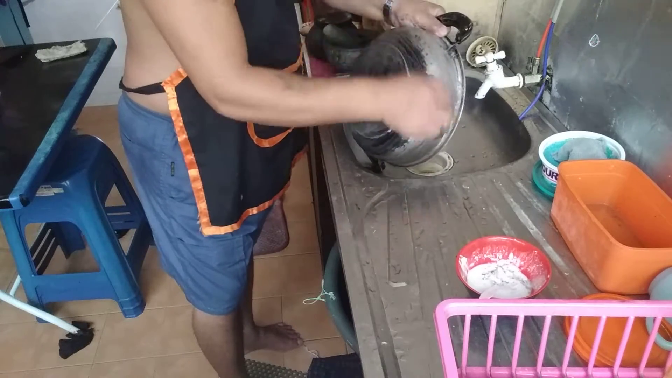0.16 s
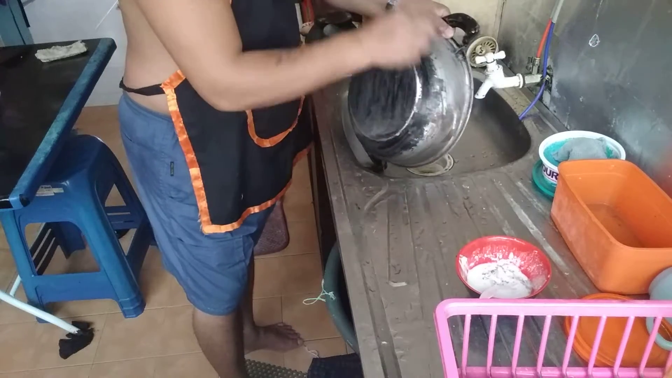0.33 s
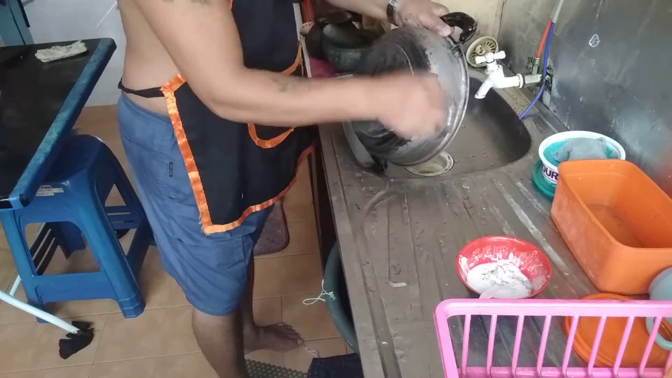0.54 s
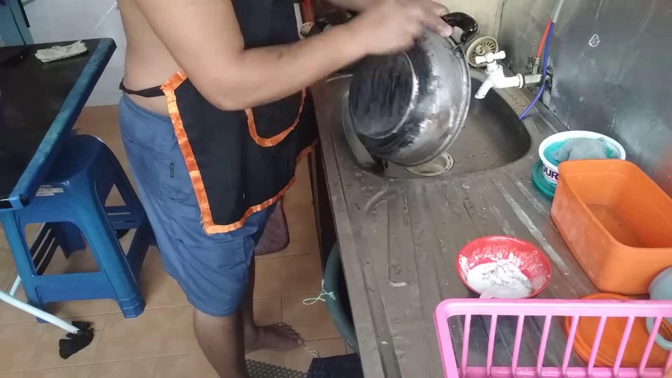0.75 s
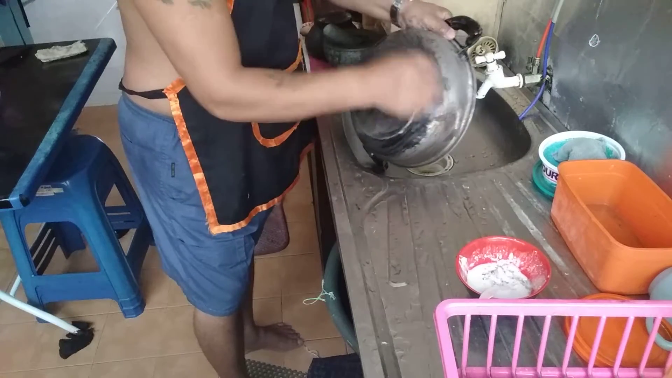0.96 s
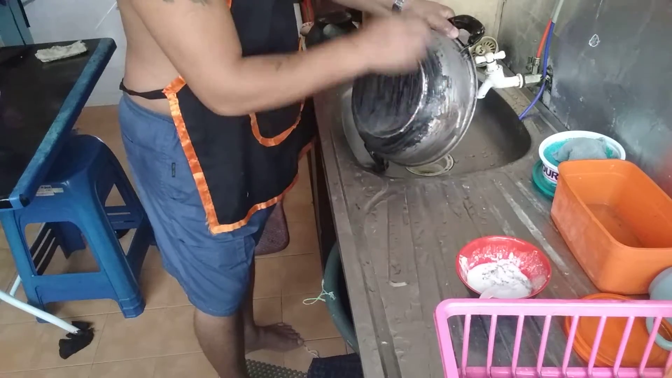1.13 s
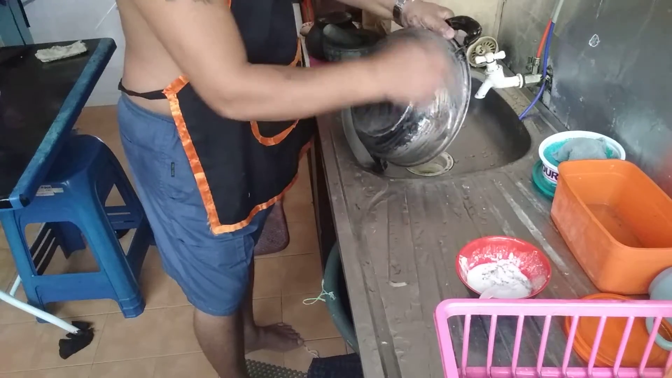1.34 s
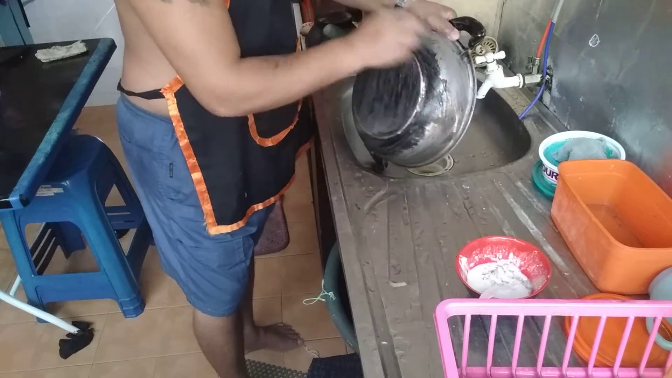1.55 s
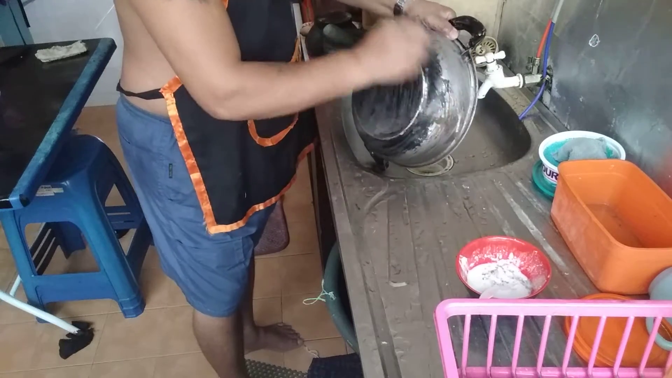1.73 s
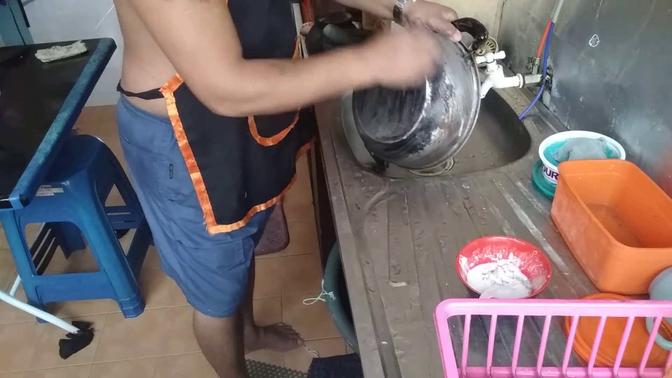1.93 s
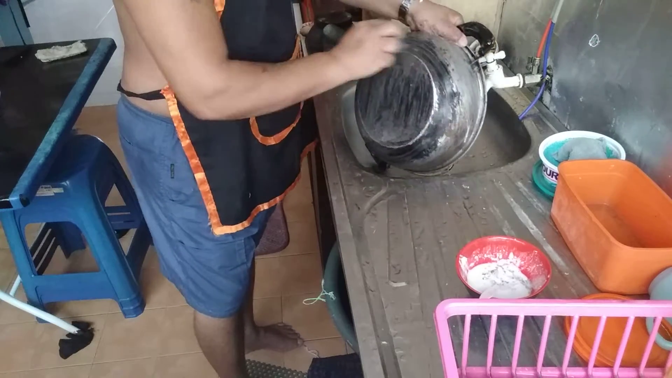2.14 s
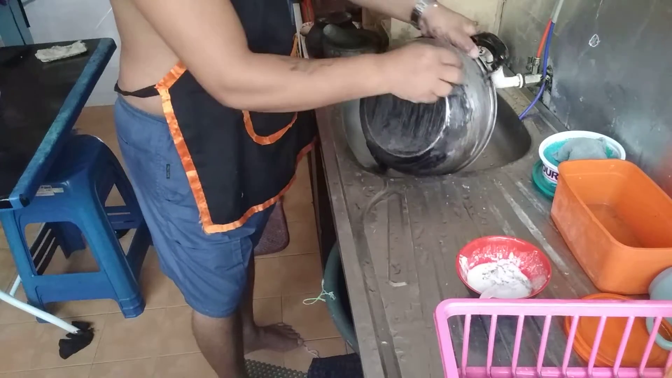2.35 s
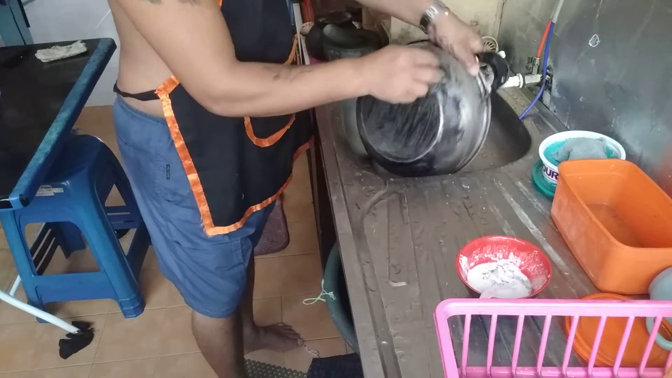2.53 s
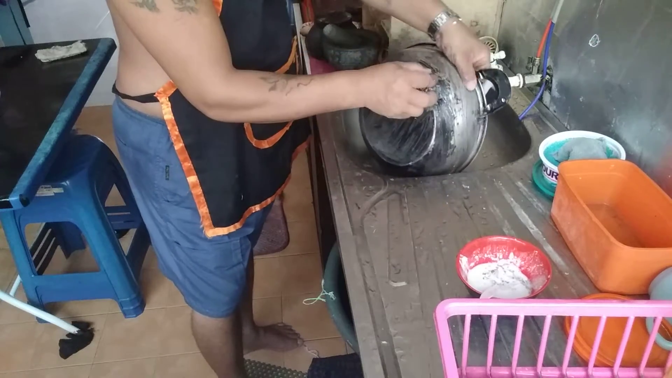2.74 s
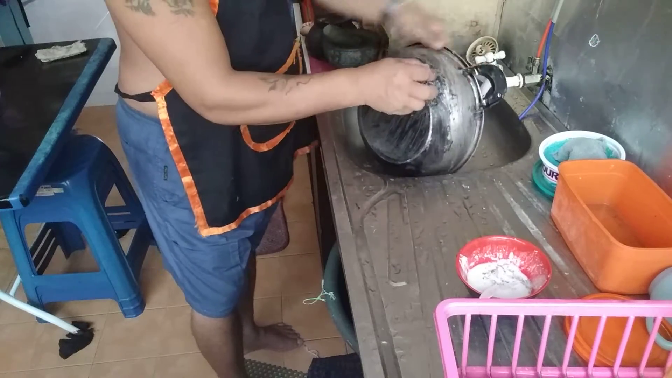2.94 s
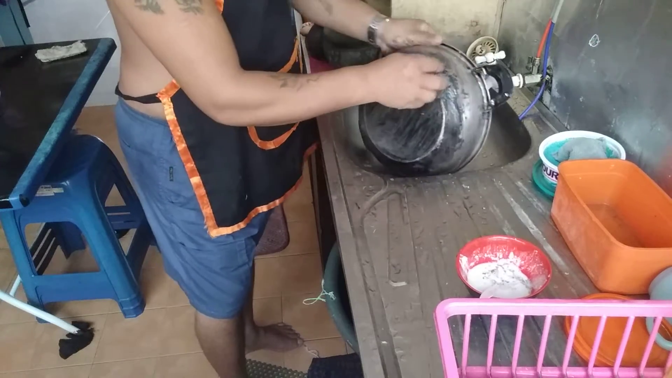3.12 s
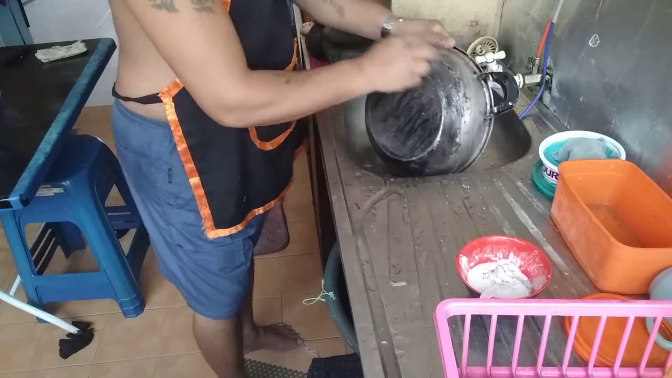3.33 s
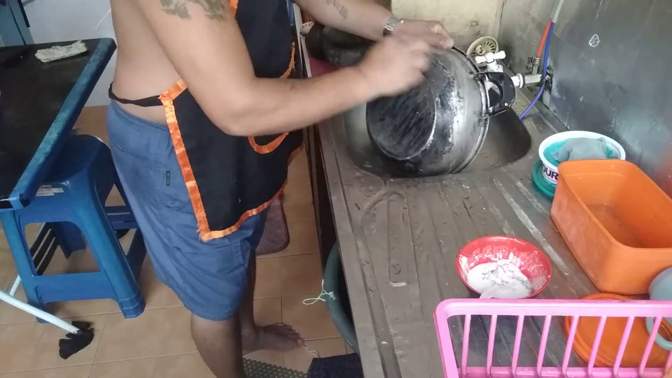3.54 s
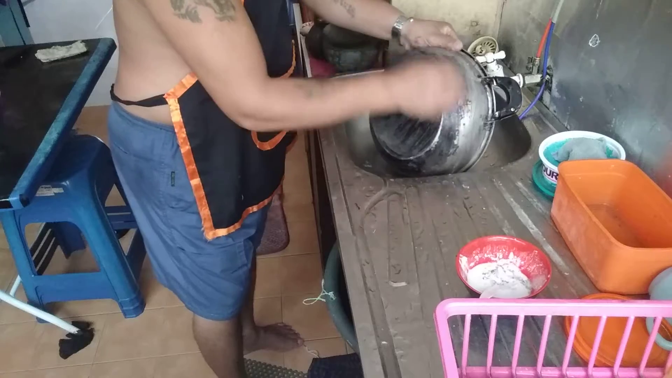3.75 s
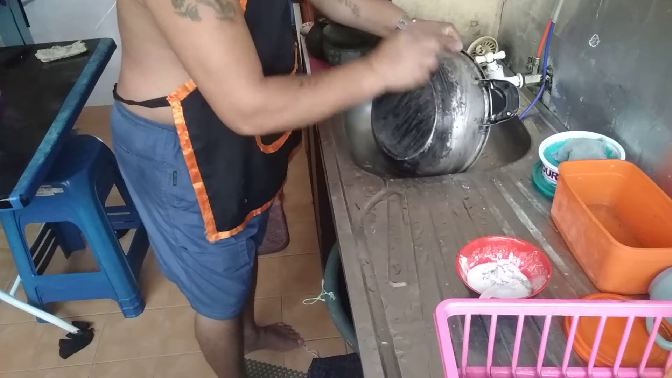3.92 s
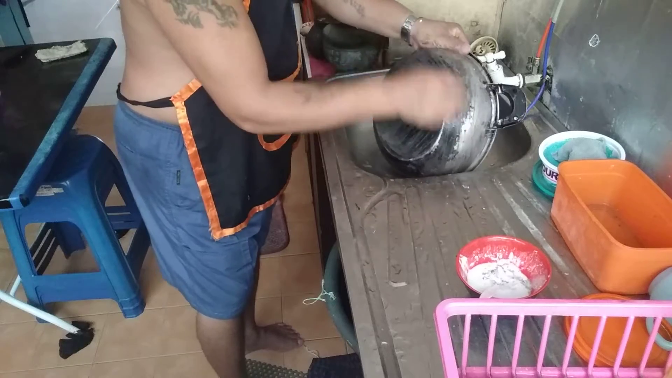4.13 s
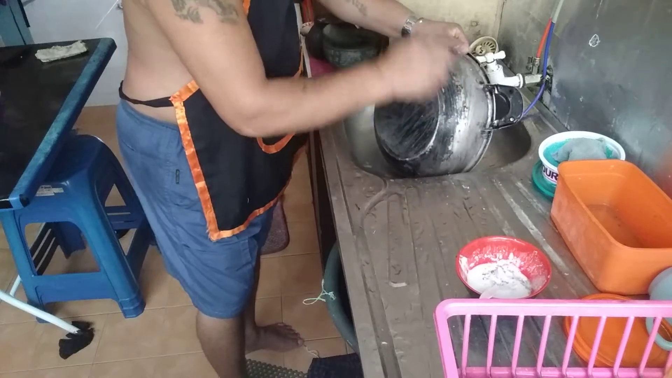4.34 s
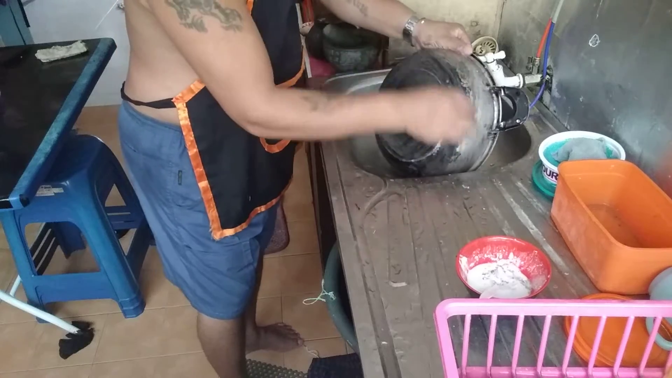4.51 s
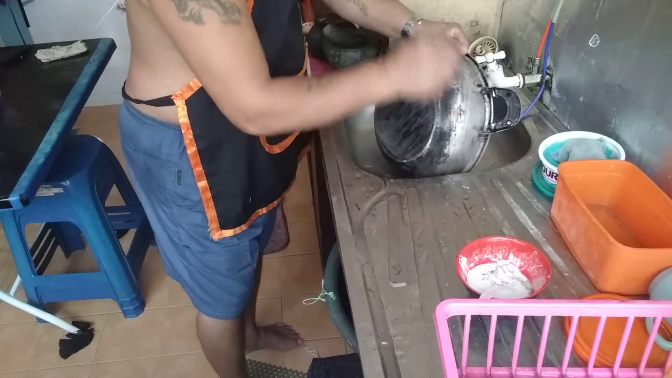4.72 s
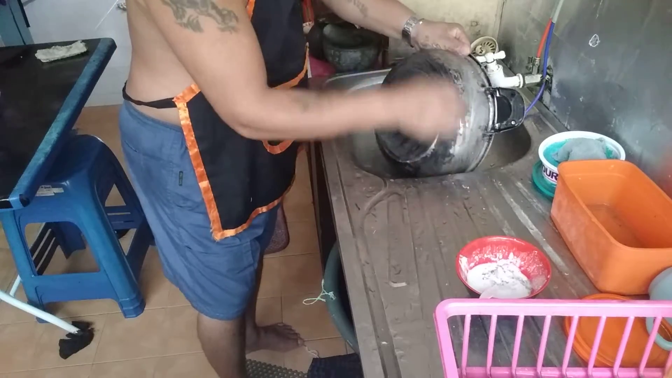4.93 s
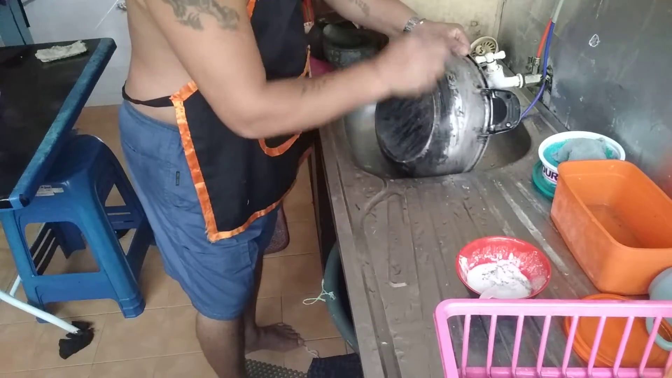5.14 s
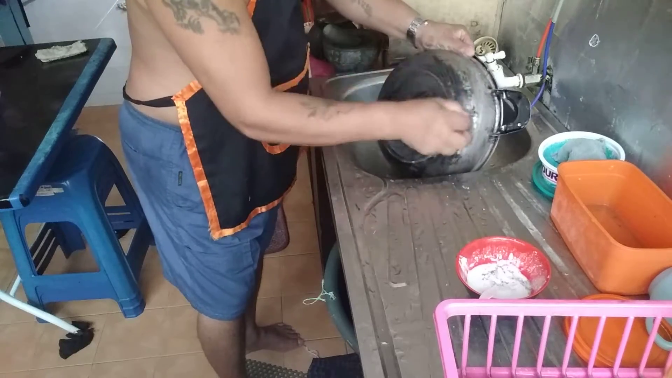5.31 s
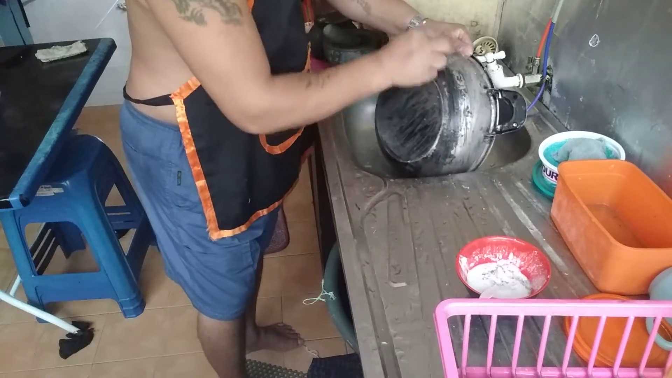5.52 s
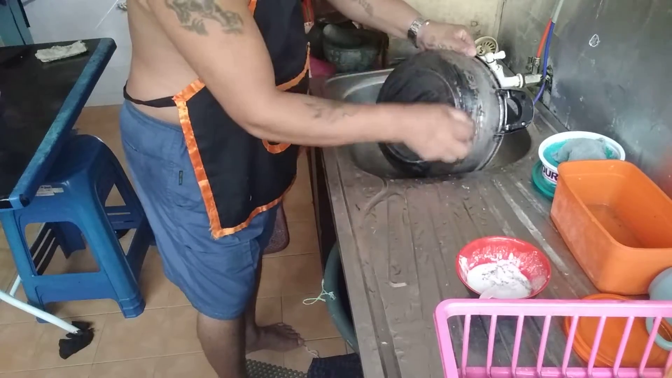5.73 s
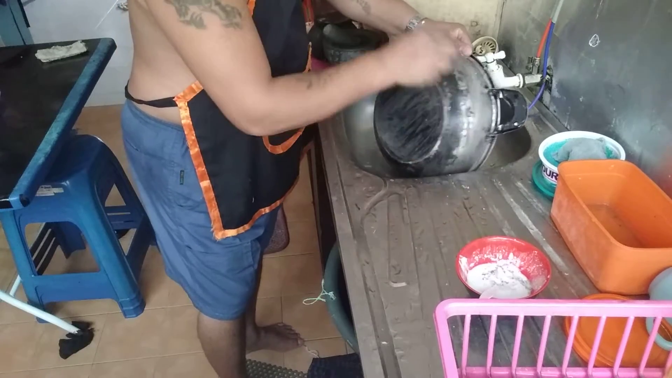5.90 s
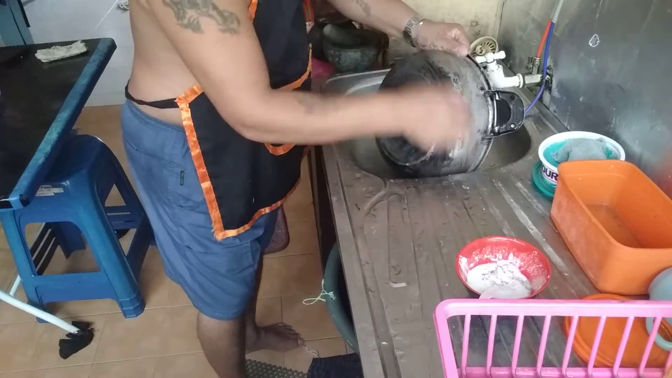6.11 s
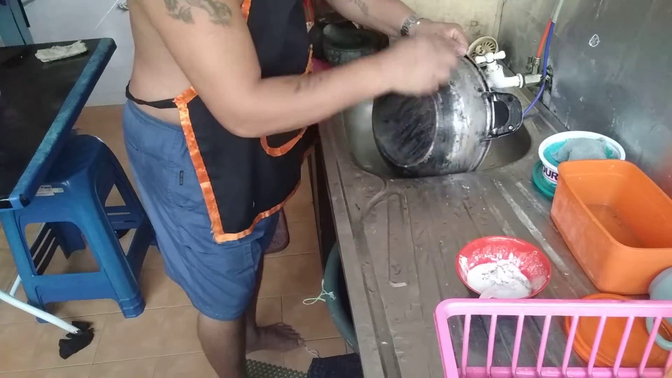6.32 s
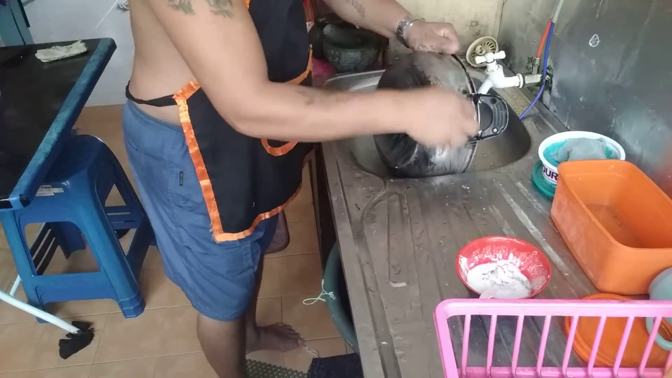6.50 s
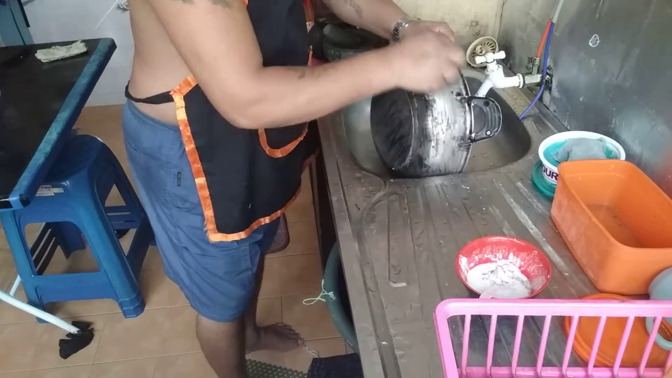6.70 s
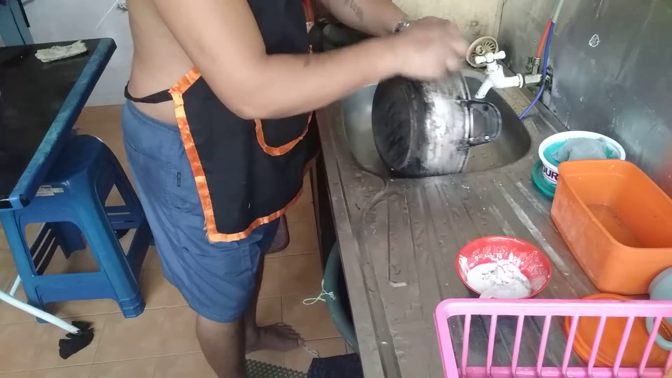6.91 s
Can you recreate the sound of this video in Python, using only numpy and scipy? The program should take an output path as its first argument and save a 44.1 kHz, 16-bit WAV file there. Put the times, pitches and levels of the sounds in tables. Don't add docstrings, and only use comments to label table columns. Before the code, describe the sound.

Brisk to-and-fro scrubbing on metal, crisp and sandy, dipping at every turn of the hand. Low rumbles and soft bumps come from the pot rocking on the sink. Midway there is a short near-quiet gap with a hollow clank, small ticks and another knock, then more energetic scrubbing that tapers to light rubs with a dull bump. Close single microphone, short room echo, faint hum.

```python
import sys
import numpy as np
from scipy import signal
from scipy.fft import rfft, irfft
from scipy.io import wavfile
from scipy.ndimage import uniform_filter1d

SR = 44100
rng = np.random.default_rng(int(sys.argv[2]) if len(sys.argv) > 2 else 0)


def wav_record(signal):
    frames = np.transpose(np.atleast_2d(signal))
    bounded = np.clip(frames, -1, 1)
    quanta = np.round(bounded * 32767).astype(np.int16)
    wavfile.write(sys.argv[1], SR, quanta)


def nominal_scale(level):
    x = np.asarray(level, float) / 20
    return 10 ** x


N = 311346
T = np.arange(N) / SR


def evened(x):
    return x / np.sqrt(np.mean(x ** 2) + 1e-20)


def coloured(x, points):
    f, db = np.transpose(points)
    hz = np.fft.rfftfreq(len(x), 1 / SR)
    curve_db = np.interp(np.log(hz + 1), np.log(f + 1), db)
    return evened(irfft(rfft(x) * nominal_scale(curve_db), len(x)))


def noise(size=N):
    return rng.standard_normal(size)


def wobble(span_s):
    size = max(int(span_s * SR), 2)
    return evened(uniform_filter1d(uniform_filter1d(noise(), size), size))


# [t/s, level at the turn/dB, level mid-stroke/dB, place of the top/0-1, bite of the wires/dB]
FIRST_BOUT = [(0.02, -27, -16.5, 0.59, -4.5), (0.236, -26, -17, 0.51, -4),
              (0.433, -30.5, -16.5, 0.51, -2.5), (0.65, -28, -15, 0.45, -4.5), (0.846, -30, -16, 0.57, 0),
              (1.072, -30.5, -16, 0.46, -0.5), (1.254, -31, -16.5, 0.47, -0.5),
              (1.477, -30, -15.5, 0.43, -2.5), (1.683, -37, -16, 0.57, 0.5), (1.893, -27.5, -15.5, 0.29, 1),
              (2.162, -34.5, -18.5, 0.43, 1.5), (2.401, -42, -29, 0.19, 4.5), (2.62, -49, -52, 0.5, -5)]
SECOND_BOUT = [(3.27, -37.5, -23.5, 0.56, 1), (3.499, -40, -17, 0.64, 0.5), (3.742, -31.5, -16, 0.43, -2),
               (3.906, -31.5, -17, 0.63, 1), (4.145, -28.5, -15.5, 0.37, -0.5), (4.321, -34, -15, 0.5, 1),
               (4.53, -34, -16.5, 0.42, 0.5), (4.726, -33, -15.5, 0.51, -0.5),
               (4.928, -27.5, -15.5, 0.39, -1), (5.13, -33, -15.5, 0.47, 2), (5.374, -42, -16.5, 0.48, -2),
               (5.576, -32, -15, 0.47, 0.5), (5.799, -34, -16.5, 0.36, 0), (6.014, -33.5, -15.5, 0.6, -2.5),
               (6.219, -29, -17, 0.39, -2), (6.398, -31.5, -21, 0.49, -5), (6.555, -33, -24.5, 0.34, -5),
               (6.717, -31.5, -28, 0.62, -11), (6.857, -35.5, -29.5, 0.51, 2), (7.002, -38, -31, 0.5, 7),
               (7.12, -39, -39, 0.5, 0)]
# [t/s, level/dB]
RESTING = [
    (2.62, -40),
    (2.72, -56),
    (2.799, -54.5),
    (2.88, -45),
    (3.0, -63),
    (3.04, -43),
    (3.09, -42.5),
    (3.15, -40.5),
    (3.27, -39),
]


def hand(roundness=1.47):
    s, resting_db = np.transpose(RESTING)
    speed = nominal_scale(np.interp(T, s, resting_db))
    bite_db = np.full(N, 3.0)
    for bout in (FIRST_BOUT, SECOND_BOUT):
        for stroke, following in zip(bout, bout[1:]):
            s0, turn0_db, top_db, place, bite = stroke
            s1, turn1_db = following[:2]
            now = (T >= s0) & (T < s1)
            way = (T[now] - s0) / (s1 - s0)
            bent = np.interp(way, [0, np.clip(place, 0.1, 0.9), 1], [0, 0.5, 1])
            turn = nominal_scale(turn0_db + way * (turn1_db - turn0_db))
            speed[now] = turn + (nominal_scale(top_db) - turn) * np.sin(np.pi * bent) ** roundness
            bite_db[now] = bite
    speed[T < FIRST_BOUT[0][0]] = nominal_scale(FIRST_BOUT[0][1])
    return speed, uniform_filter1d(bite_db, size=1500)


def slips(per_s, spread_db):
    size_db = spread_db * np.minimum(rng.exponential(1, N), 5)
    size = nominal_scale(size_db) * rng.choice([-1., 1.], N)
    return evened(size * (rng.random(N) < per_s / SR))


def resonate(x, hz, width):
    return signal.lfilter(*signal.iirpeak(hz, hz / width, SR), x)


# [f/Hz, level/dB per Hz]
HISS = [(2940, -43), (5000, -22), (5360, -13.5), (6520, -15), (8450, -10), (12000, -0.5), (14700, -0.5),
        (15500, -5), (16200, -7.5), (16500, -62)]
# [f/Hz, level/dB per Hz]
SCRAPE = [(1500, -23.5), (2500, -14), (3500, -11), (4300, -5.5), (4800, -1), (5500, -7.5), (6200, -2),
          (7000, -0.5), (9000, -0.5), (12000, -61)]
# [f/Hz, level/dB per Hz]
RUB = [(900, -12), (1800, -3), (3000, -0.5), (4200, -6), (6000, -28)]
# [from t/s, to t/s]
HELD = [
    (2.41, 3.27),
    (6.64, 7.2),
]
# [f/Hz, width/Hz, level/dB]
WALL = [(426, 36, -13.5), (667.7, 9.2, -11.5), (1092, 61, -11.5), (1183, 27, -18.5), (1315, 12.6, -7.5),
        (1810, 990, -9.5), (2140, 15, -8), (2413, 15, -9.5), (2855, 38, -4.5), (3189, 39, -1.5),
        (3724, 83, -4), (4255, 25, 0), (4630, 94, -1)]


def scourer():
    speed, bite_db = hand()
    clumps_db = 0.74 * wobble(0.02) + 0.33 * wobble(0.0038)
    force = speed * nominal_scale(clumps_db)
    fine = slips(per_s=24000, spread_db=2.0)
    coarse = slips(per_s=16000, spread_db=1.0)
    scrape = nominal_scale(-16 + bite_db) * (speed / 0.19) ** 0.086
    out = force * coloured(fine, HISS) + force * scrape * coloured(coarse, SCRAPE)

    held = sum(1.0 * ((T > a) & (T < b)) for a, b in HELD)
    held = uniform_filter1d(held, size=1500)
    out += held * nominal_scale(-46) * (force / 0.19) ** 0.71 * coloured(coarse, RUB)

    ring = nominal_scale(-28.5 + 0.8 * bite_db)
    ring = ring * (speed / 0.11) ** -0.3
    ring = ring * nominal_scale(-9 * held)
    for hz, width, db in WALL:
        nodes_db = 3.6 * np.tanh(wobble(0.061))
        drive = force * ring * nominal_scale(db - 5.5 + nodes_db) * noise()
        out += resonate(drive, hz, width) * np.sqrt(SR / np.pi / width)
    return out


# [f/Hz, level/dB, t60/s]
RING = [(118.3, -13.5, 0.95), (289.4, 0, 0.23), (254, -28, 0.17), (360, -13, 0.2), (516, -18, 0.41),
        (654, -18, 0.41), (826, -45, .2), (1110, -13.5, 0.18), (1316, -25, 0.29)]
# [f/Hz, level/dB per Hz]
BOOM = [(60, -28), (110, 10), (300, -2), (600, -5), (900, -16), (1500, -21)]
# [f/Hz, level/dB per Hz]
CLATTER = [(150, 16), (400, 6), (700, -0.5), (1000, 2.5), (1500, 5.5), (2500, -19.5), (4000, -41.5),
           (7000, -41), (10000, -26), (16000, -34)]
# [f/Hz, level/dB per Hz]
CRACK = [(800, -23), (2000, 8), (3500, 3.5), (6500, -5.5), (9000, -4), (16000, -12)]


def knock(thud_db, hz, ring_db, clatter_db, rise_s, crack_db):
    t = np.arange(SR // 2) / SR
    start = np.sin(np.pi / 2 * np.minimum(t / rise_s, 1)) ** 2
    thud_fall_db = 60 * t / 0.12 * (hz / 150) ** 0.23
    out = -nominal_scale(thud_db - thud_fall_db) * np.sin(2 * np.pi * hz * t)
    for f, db, t60 in RING:
        out -= nominal_scale(ring_db + db - 60 * t / t60) * np.sin(2 * np.pi * f * t)
    out += nominal_scale(ring_db - 4.0 - 60 * t / 0.3) * coloured(noise(len(t)), BOOM)
    dying = nominal_scale(-60 * t / 0.12) + nominal_scale(-14.0 - 60 * t / 0.35)
    out += nominal_scale(clatter_db) * dying * coloured(noise(len(t)), CLATTER)
    out += nominal_scale(clatter_db + crack_db - 60 * t / 0.22) * coloured(noise(len(t)), CRACK)
    return start * out


# [t/s, thud level/dB, thud f/Hz, ring level/dB, clatter level/dB]
BUMPS = [
    (0.08, -29, 117, -64, -65),
    (0.405, -20, 147, -61, -32),
    (6.607, -28, 100, -56, -48),
]
KNOCKS = [
    (2.6336, -21.5, 180, -23.5, -37),
    (3.0077, -29, 148, -33.5, -40),
    (6.600, -41, 430, -58, -38),
]
RATTLES = [
    (2.69, -37, 109, -41.5, -45),
    (2.747, -36, 1506, -45, -32.5),
    (2.765, -36, 514, -46, -39),
    (2.79, -46, 108, -60, -44),
    (2.826, -46.5, 777, -50, -59),
    (3.067, -44, 1316, -42, -50),
    (3.074, -40, 116, -50, -62),
    (3.092, -44, 1316, -51, -45),
]


def knocks():
    out = np.zeros(N + SR)
    for rows, rise_s, crack_db in ((BUMPS, 0.018, -23), (KNOCKS, 0.0022, -2), (RATTLES, 0.0021, -21)):
        for s, *levels in rows:
            hit = knock(*levels, rise_s, crack_db)
            out[round(s * SR):][:len(hit)] += hit
    return out[:N]


def swell(s, length, fade_db):
    way = np.clip((T - s) / length, 0, 1)
    edges = np.minimum(np.minimum(way, 1 - way) / 0.11, 1)
    return (edges * nominal_scale(fade_db * way)) ** 2


# [f/Hz, level/dB per Hz]
RUMBLE = [(15, -10.5), (30, -8), (40, -4.5), (49, -2.5), (65, -4.5), (85, -21), (120, -34)]
# [f/Hz, level/dB per Hz]
BASIN = [(60, -23), (100, 2), (130, -1.5), (175, -0.5), (230, -8.5), (290, -7), (400, -27.5)]
# [f/Hz, level/dB per Hz]
DRAG = [(250, -10), (400, 2.5), (650, -7), (800, -10.5), (1100, -1), (1600, -3), (2500, -13.5), (4000, -60)]
# [t/s, length/s, counter rumble level/dB, basin level/dB]
SHOVES = [(0.054, 0.6, -65, -44.5), (1.014, 0.14, -40, -50), (1.497, .25, -41, -46.5),
          (1.765, 0.11, -47, -51), (2.045, 0.13, -37.5, -52), (2.455, 0.49, -64, -48.5),
          (4.01, 0.11, -55, -39.5), (4.267, .45, -46, -56), (5.21, 0.21, -57, -45), (5.63, 0.23, -58, -47),
          (6.11, 0.15, -68, -45.5), (6.66, 0.95, -51, -52)]
# [t/s, length/s, drag level/dB]
SLIDES = [
    (0.043, 0.096, -52.5),
    (0.385, .07, -46.5),
    (2.43, 0.24, -49.5),
    (6.676, 0.094, -54.5),
]


def rocking():
    speed, bite_db = hand()
    first_bout_db = -5.5 * (T < RESTING[0][0])
    push = (speed / 0.15) ** 0.76 * nominal_scale(0.61 * bite_db + first_bout_db)
    rumble = nominal_scale(-54.5) ** 2
    basin = nominal_scale(-55.5) ** 2 + (nominal_scale(-53) * push) ** 2
    drag = (nominal_scale(-53) * push) ** 2
    for s, length, rumble_db, basin_db in SHOVES:
        shove = swell(s, length, fade_db=-11.5)
        rumble = rumble + shove * nominal_scale(2 * rumble_db)
        basin = basin + shove * nominal_scale(2 * basin_db)
    for s, length, db in SLIDES:
        drag = drag + swell(s, length, fade_db=0) * nominal_scale(2 * db)
    out = np.zeros(N)
    for power, shape in ((rumble, RUMBLE), (basin, BASIN), (drag, DRAG)):
        lumps = nominal_scale(0.66 * wobble(0.0081))
        out += np.sqrt(power) * lumps * coloured(noise(), shape)
    return out


def kitchen(x, t60=0.65):
    at = np.arange(200, SR // 2 - 20, 20)
    taps = np.zeros(SR // 2)
    signs = rng.choice([-1., 1.], len(at))
    taps[at + rng.integers(0, 20, len(at))] = signs * nominal_scale(-60 * at / SR / t60)
    return signal.fftconvolve(x, taps / np.linalg.norm(taps))[:N]


# [f/Hz, level/dB per Hz]
ROOM_TONE = [(20, 11), (100, -5), (300, -3), (1000, -10), (3000, -16), (8000, -48), (16000, -50)]


def room_tone():
    hum = nominal_scale(-55 + 0.3 * wobble(0.031)) * np.sin(2 * np.pi * 100 * T)
    return nominal_scale(-59.5) * coloured(noise(), ROOM_TONE) + hum


def scene():
    near = scourer() + knocks()
    echo = nominal_scale(-14) * kitchen(near)
    mono = near + echo + rocking() + room_tone()
    return np.array([mono, mono])


def drop_weak_patches(x, low_hz=1500, high_hz=4700, under_db=-2.0, cut_db=-40):
    hz, _, z = signal.stft(x, SR, nperseg=2048, noverlap=1536)
    hz = hz[:, None]
    power = abs(z[0]) ** 2
    patch = uniform_filter1d(uniform_filter1d(power, size=6, axis=0), size=3, axis=1)
    around = uniform_filter1d(patch, size=28, axis=0)
    loud = power.sum(0) / power.sum(0).mean()
    eager = np.clip(loud, 0, 1) ** 0.08 * (hz / 3300) ** 0.35
    weak = patch < around * np.minimum(eager, 1) * nominal_scale(2 * under_db)
    weak = weak & (hz > low_hz) & (hz < high_hz)
    return signal.istft(z * nominal_scale(cut_db * weak), SR, nperseg=2048, noverlap=1536)[1][:, :N]


def top_cut(x):
    return signal.sosfilt(signal.butter(12, 16870, fs=SR, output="sos"), x)


def record(dry):
    low_pass = signal.firwin(511, 15750, window=("kaiser", 9), fs=SR)
    mix = signal.oaconvolve(drop_weak_patches(dry), low_pass[None], "same")
    return top_cut(mix)


dry = scene()
out = record(dry)
wav_record(out)
```